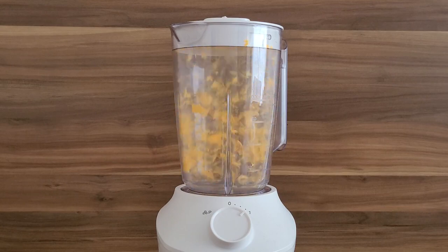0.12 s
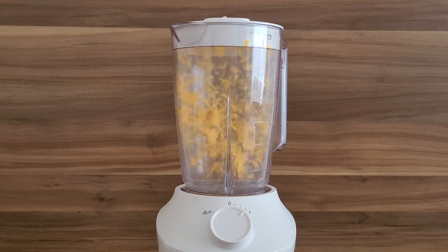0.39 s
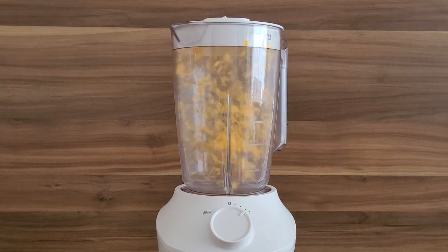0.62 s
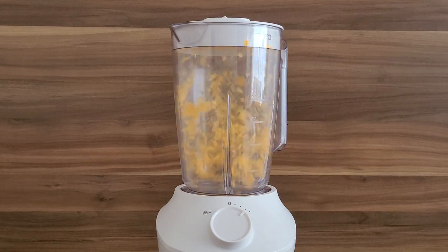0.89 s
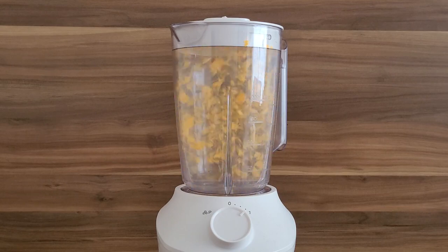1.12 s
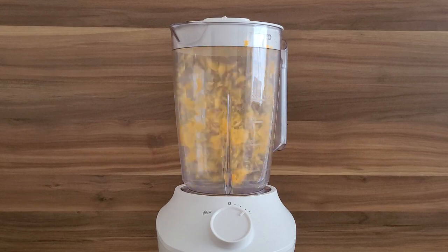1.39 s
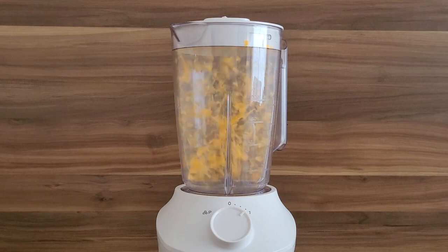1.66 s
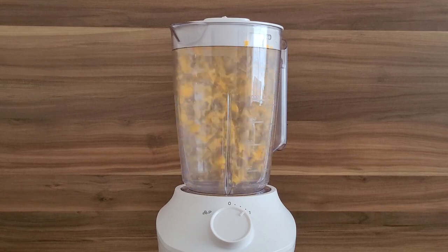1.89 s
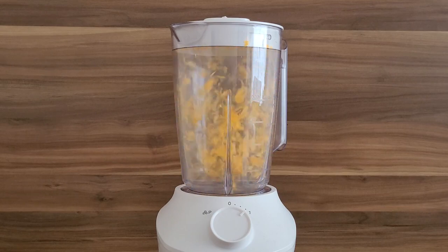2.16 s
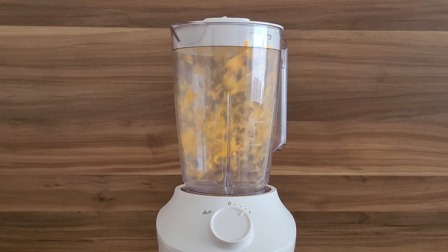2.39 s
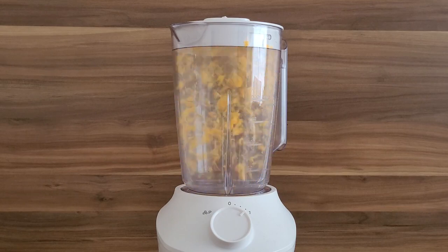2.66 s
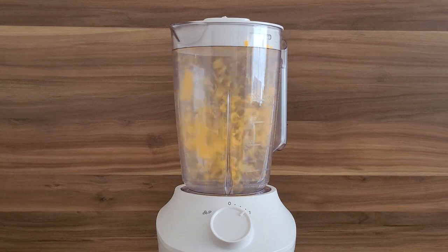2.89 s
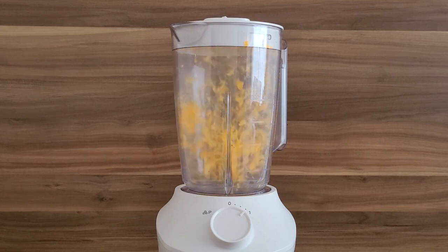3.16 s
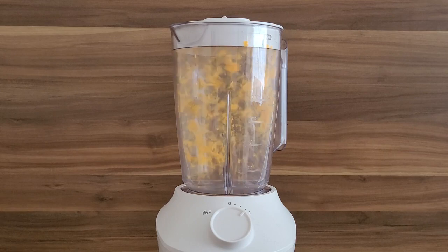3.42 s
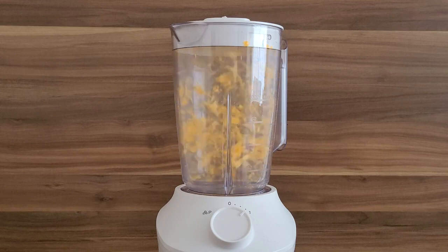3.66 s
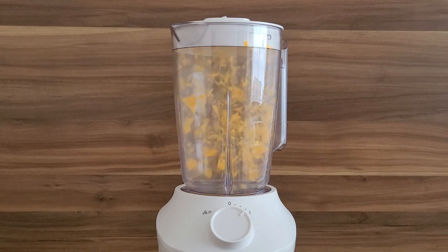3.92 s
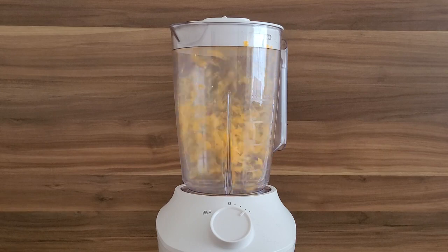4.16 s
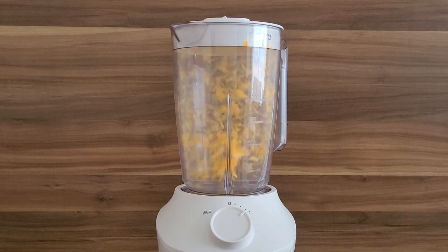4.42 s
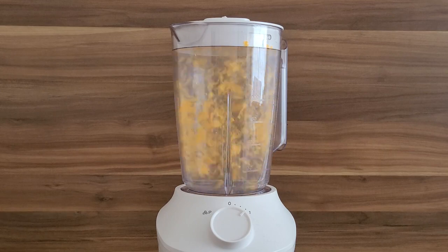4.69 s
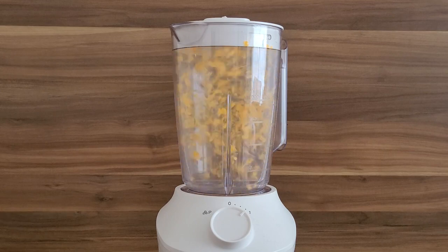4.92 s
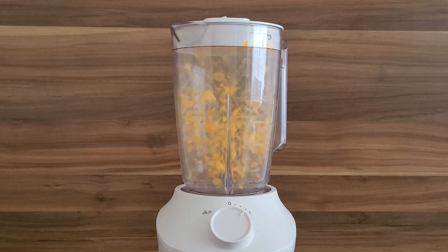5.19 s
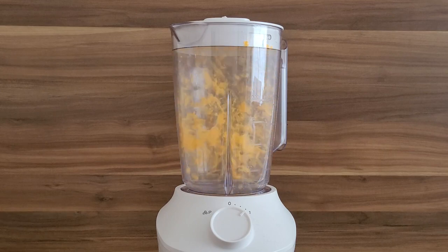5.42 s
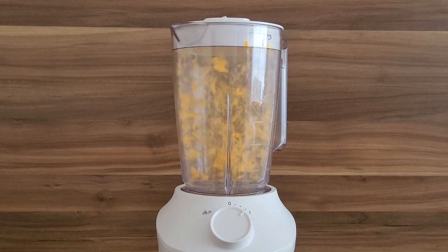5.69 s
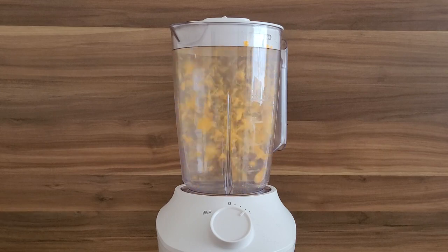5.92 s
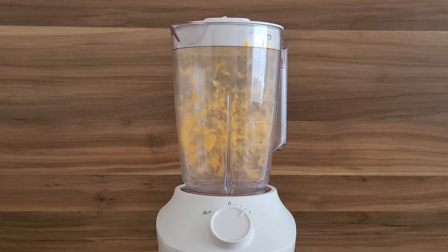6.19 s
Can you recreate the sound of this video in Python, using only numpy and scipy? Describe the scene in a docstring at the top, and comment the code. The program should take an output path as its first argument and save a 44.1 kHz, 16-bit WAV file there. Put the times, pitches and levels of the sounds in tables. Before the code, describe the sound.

Close, loud blender in a small reflective kitchen: constant motor drone and rushing air, covered by a dense crisp rattle of small plastic pieces. Irregular snaps and clacks burst out several times a second, thickest after the middle, when the motor roar also grows a little stronger. A few heavy low pops strike the left microphone. The sound begins and ends mid-run.

```python
"""In a small hard kitchen a countertop blender runs at full speed with thin plastic shards whirling in its jar.
The shaft hums as sine tones over a roar of air and housing, made of random spectra through resonances.
Shards rattle in waves of filtered ticks; cracks (noise bursts) and knocks (decaying sines) echo off the walls.
Jolts pop the left microphone as filtered pressure steps, and a limiter ducks both sides on the loudest peaks."""
import sys
import numpy as np
from scipy import signal
from scipy.fft import irfft
from scipy.io import wavfile
from scipy.ndimage import uniform_filter1d, minimum_filter1d

SR = 44100
rng = np.random.default_rng(int(sys.argv[2]) if len(sys.argv) > 2 else 0)


def amp(db):
    return 10 ** (np.asarray(db, float) / 20)


def wav_out(sig):
    """Save sig, one row per channel (or a flat mono array), as 16-bit PCM at SR to the path in sys.argv[1]."""
    wavfile.write(sys.argv[1], SR, np.round(np.clip(np.atleast_2d(sig).T, -1, 1) * 32767).astype(np.int16))


N = 278695

# loudness of motor and air, which the steady rattle follows too: (time [s], level [dB])
MOTOR_LEVEL = [(0.1, -31), (0.42, -30.5), (0.99, -29), (1.28, -31), (2.01, -31), (2.67, -33.5),
               (3.25, -33.5), (3.51, -32), (3.68, -28), (3.92, -28), (4.48, -28.5), (4.85, -28),
               (6.22, -30)]


def evened(x):
    """Scales to rms 1."""
    return x / np.sqrt(np.mean(x ** 2) + 1e-20)


def read(points, hz):
    """Value of a spectrum table at hz, interpolated along log frequency."""
    f, value = np.transpose(points)
    return np.interp(np.log(hz + 1), np.log(f + 1), value)


def curve(rows, axis):
    """One column of a time table, for every sample."""
    rows = np.array(rows)
    return np.interp(np.arange(N) / SR, rows[:, 0], rows[:, axis])


def waver(hz):
    """Slow random wander of rms 1, up to about hz."""
    smooth = uniform_filter1d(rng.standard_normal(N), size=300)
    return evened(signal.lfilter([1], [1, -np.exp(-2 * np.pi * hz / SR)], smooth))


def coloured(x, points):
    """Filters x by a spectrum table."""
    hz = np.fft.rfftfreq(512, 1 / SR)
    taps = np.roll(irfft(amp(read(points, hz))), 256) * np.hanning(512)
    return signal.oaconvolve(x, taps, "same")


def hum():
    """Shaft orders are sines locked to the turning shaft, each wavering a little in level."""
    # shaft speed: (time [s], speed [turns per s])
    shaft = [(0, 310.1), (2.1, 310.2), (2.5, 309.7), (3.4, 309.7), (3.8, 310.1), (6.32, 310.4)]
    # shaft orders: (multiple of the shaft speed, relative level [dB], left over right [dB])
    orders = [(1, 0.5, -3.5), (2, -18.5, -11.5), (3, -18, 2), (4, -31.5, 30.5), (12, -17, 4)]
    turns = np.cumsum(curve(shaft, axis=1)) / SR
    out = np.zeros((2, N))
    for k, db, left_db in orders:
        level = amp(db + 1.67 * waver(hz=11))
        tone = np.sqrt(2) * np.sin(2 * np.pi * (round(k) * turns + rng.random())) * level
        out += tone * amp([[left_db / 2], [-left_db / 2]])
    return out


def roar():
    """Air noise as random short-time spectra through the housing resonances, with drifting patches."""
    # roar of fan air and tiny shards: (frequency [Hz], relative level per Hz [dB])
    air_spectrum = [(30, -48), (60, -49), (100, -16.5), (190, -1.5), (330, 2), (520, -0.5), (1150, -1),
                    (2500, 0), (5000, -2.5), (8700, -12.5), (12000, -9.5), (14200, -14), (15700, -4)]
    # housing, jar and counter resonances, plus a narrow line at 410 Hz, 100 Hz above the shaft tone: (centre
    # [Hz], width [Hz], boost [dB])
    resonances = [(139, 39, 16.5), (232, 22.5, 7.5), (272.5, 35, 12), (318, 49, 2), (394.5, 27, 9),
                  (410, 9, 5.5), (760, 15, 7.5), (972, 107, 8), (1325, 19, 8.5), (1357, 51, 6.5),
                  (1935, 79, 3.5), (2390, 29, 9), (2635, 27, 7.5), (3470, 390, 4), (4680, 450, 0.5),
                  (7610, 680, 10.5), (10700, 210, 13)]
    # how alike the two microphones hear it: (frequency [Hz], left-right likeness [1 = same])
    likeness = [(60, 0.65), (130, 0.97), (290, 0.96), (640, 0.8), (1410, 0.57), (3100, 0.42), (6820, 0.062),
                (15000, 1)]
    # balance between the microphones: (frequency [Hz], left over right [dB])
    balance = [(60, -3), (110, -2), (200, 1.5), (380, 1), (700, 0.5), (1290, 0), (2380, 2.5), (4400, 1.5),
               (8120, -3), (15000, 14.5)]
    frames, hz = N // 1024 + 5, np.fft.rfftfreq(4096, 1 / SR)
    a, b, c, d, patches = rng.standard_normal((frames, 2049, 5)).T
    patches = uniform_filter1d(patches, size=40, axis=0)  # along frequency
    patches = evened(uniform_filter1d(patches, size=4, axis=1))  # along time
    body_db = read(air_spectrum, hz)
    for centre, width, boost in resonances:
        body_db = body_db + boost / (1 + (2 * (hz - centre) / width) ** 2)
    same = np.clip(read(likeness, hz), -1, 1)[:, None]
    tilt = amp(read(balance, hz) / 2)[:, None]
    left = a + 1j * b
    right = same * left + np.sqrt(1 - same ** 2) * (c + 1j * d)
    spectra = np.array([left * tilt, right / tilt]) * amp(body_db[:, None] + 0.53 * patches)
    air = evened(signal.istft(spectra, nperseg=4096, noverlap=3072)[1][:, :N])
    return amp(7.0 + 0.97 * waver(hz=40)) * air


def on_left(x):
    """Puts x at the left microphone, 34 dB weaker at the right."""
    return x * amp([[0], [-34]])


def supply_hum():
    """Faint steady mains sine, mostly on the left."""
    # supply hum: frequency [Hz], amplitude before the low cut [dB]
    mains = (50, -63)
    hz, db = mains
    return on_left(amp(db) * np.sin(2 * np.pi * hz * np.arange(N) / SR))


def wave_level():
    """Level of the swarm: each wave swells fast and fades more slowly, over a lull that follows the motor."""
    # waves of shards thrown up the jar wall: (time of crest [s], level [dB], length [s])
    crests = [(.07, -40, 0.041), (.18, -29, 0.13), (0.346, -25, 0.12), (0.634, -22.5, 0.082),
              (0.662, -26, .06), (0.763, -27, 0.082), (0.995, -17.5, 0.063), (1.116, -26.5, 0.12),
              (1.34, -29, 0.32), (1.504, -35, 0.092), (1.62, -28.5, 0.072), (1.817, -27, .2),
              (1.977, -29, 0.25), (2.114, -28, 0.18), (2.364, -29.5, 0.075), (2.556, -27.5, 0.033),
              (2.645, -25.5, 0.087), (2.822, -31, 0.076), (2.978, -21.5, 0.041), (3.257, -22, .05),
              (3.511, -20.5, 0.066), (3.707, -29, 0.18), (3.84, -24, 0.051), (3.954, -26, 0.054),
              (4.024, -36, 0.037), (4.229, -18.5, .07), (4.463, -19, 0.066), (4.6, -21.5, 0.15),
              (4.885, -20.5, 0.083), (5.034, -29, .1), (5.156, -25, 0.23), (5.603, -26, 0.095),
              (5.75, -25, 0.43), (6.19, -22.5, 0.12), (6.31, -31, .1)]
    rise, drop_db = 0.6, -13.5  # rise time as a share of the length; fall over one length
    lull_db = -3.5  # rattle between waves, over the motor level
    t = np.arange(N) / SR
    power = amp(2 * (curve(MOTOR_LEVEL, axis=1) + lull_db))
    for s, db, length in crests:
        away = np.maximum((t - s) / length, (s - t) / (rise * length))
        power = power + amp(2 * (db + drop_db * away))
    return np.sqrt(power)


def rattle(count=10):
    """Thousands of small shards a second tick the wall, each tick ringing in one of several bands chosen at
    random; a few are large."""
    # colour of the swarm: (frequency [Hz], relative level per Hz [dB])
    swarm = [(500, -46), (900, -22), (1500, -10), (2600, -3), (4200, -6), (5000, 1), (7500, -1), (9500, -3),
             (12300, 4), (14200, -1.5), (15700, 0.5)]
    ticks_per_s = 2600
    ticks = (rng.random(N) < ticks_per_s / SR) * amp(4.9 * np.minimum(rng.exponential(1, N), 4))
    kind, noise = rng.integers(0, count, N), rng.standard_normal(N)
    decay = np.exp(-np.arange(300) / 38.0)  # in samples, just under 1 ms
    snaps = np.zeros(N)
    for k, hz in enumerate(np.geomspace(1300, 14500, count)):
        burst = signal.oaconvolve(ticks * (kind == k), decay)[:N] * noise
        ringing = signal.lfilter(*signal.iirpeak(hz, 2.5, SR), burst)
        snaps += .5 * burst + np.sqrt(9000 / hz) * ringing
    return evened(coloured(snaps, swarm)) * wave_level()


def cracks():
    """Each crack is a noise burst of about 3 ms, strengthened where the shard rings; lesser ones fall at random."""
    # single cracks, before the room: (time [s], peak level [dB], ring of the shard [Hz])
    single = [(0.0715, -8, 12300), (0.3396, -12, 7920), (0.4449, -10.5, 2630), (0.5089, -7, 3560),
              (0.578, -6, 7740), (0.628, -11, 11900), (0.7404, -5.5, 4820), (0.7614, -5, 12500),
              (0.8435, -6.5, 11100), (1.258, -4.5, 7660), (1.3164, -7, 7240), (1.474, -7.5, 12000),
              (1.514, -7, 7240), (1.6072, -11, 5650), (1.7817, -10, 7300), (1.8334, -9, 7450),
              (1.8724, -5.5, 7670), (2.053, -12, 12500), (2.0853, -7, 2610), (2.3206, -9.5, 3460),
              (2.369, -9.5, 12400), (2.7931, -12, 12000), (2.9786, -11, 12200), (3.242, -9, 10700),
              (3.259, -5, 12400), (3.3538, -14.5, 5900), (3.444, -12, 12400), (3.484, -8, 11100),
              (3.5016, -5.5, 12100), (3.5772, -9.5, 6460), (3.65, -11, 7410), (3.6845, -5, 10700),
              (3.7227, -3, 11100), (3.7559, -5, 12400), (3.835, -9, 13800), (3.9402, -7, 12400),
              (4.0238, -4, 10300), (4.0664, -6.5, 12000), (4.202, -9, 12400), (4.2287, -8, 11800),
              (4.417, -5, 12100), (4.5377, -7, 10700), (4.6145, -7, 7800), (4.6874, -10, 11000),
              (4.696, -7.5, 7730), (4.7506, -8, 2900), (4.8212, -5.5, 5860), (4.8614, -7, 11500),
              (4.892, -7, 4740), (5.0157, -3.5, 10600), (5.1614, -8, 7430), (5.4316, -13, 14800),
              (5.475, -9, 7330), (5.521, -14, 11000), (5.5737, -7, 7810), (5.6924, -8, 10700),
              (5.7167, -6, 5430), (5.7564, -10, 11500), (5.9142, -8.5, 9820), (6.0658, -10, 4750),
              (6.1934, -8.5, 7380), (6.2167, -9, 10700)]
    # colour of one crack: (frequency [Hz], relative level per Hz [dB])
    shard = [(410, -54), (700, -1), (1150, -15.5), (1360, -3.5), (1600, -4.5), (2590, -6), (4190, -7),
             (5020, -1), (9980, -4), (12300, -0.5), (15500, -3)]
    small_per_s, small_db, small_spread_db = 6.5, -11, 1.5
    when, size, tone = rng.random((round(small_per_s * N / SR), 3)).T
    levels = small_db - small_spread_db * 2 * size
    small = zip(when * N / SR, levels, 3000 * (14000 / 3000) ** tone)  # ring 3 to 14 kHz
    t, out = np.arange(1500) / SR, np.zeros(N + 1500)
    shape = (1 - np.exp(-t / .0004)) * np.exp(-t / .0028)
    for s, db, hz in list(single) + list(small):
        noise = rng.standard_normal(1500)
        bright = signal.lfilter(*signal.iirpeak(min(hz, 20000), 2.2, SR), noise)
        snap = shape * evened(coloured(noise + 0.61 * bright, shard))
        out[round(s * SR):][:1500] += amp(db) * snap / abs(snap).max()
    return out[:N]


def knocks():
    """Bigger pieces knock the jar wall, which rings briefly in a few decaying modes."""
    # knocks, before the room: (time [s], peak level [dB], tone of the struck patch [Hz])
    struck = [(.14, -10.5, 2400), (.297, -17, 1610), (.989, -9.5, 1480), (1.05, -8.5, 2560),
              (1.257, -8.5, 2560), (2.0836, -10, 1630), (3.5763, -11, 2200), (3.7219, -10.5, 1430),
              (3.7534, -10.5, 1350), (4.2273, -19, 1350), (4.4427, -14, 1380), (4.5675, -13, 1400),
              (4.6092, -16, 1260), (4.954, -25, 1340), (5.3368, -16, 2390), (5.773, -17, 1800)]
    # wall modes: (multiple of the patch tone, relative level [dB], time to fall 60 dB [s])
    modes = [(1, 0, .009), (1.35, -4, .007), (.72, -4, .012)]
    t, out = np.arange(1500) / SR, np.zeros(N + 1500)
    for s, db, hz in struck:
        ring = sum(amp(mode_db - 60 * t / t60) * np.sin(2 * np.pi * k * hz * t) for k, mode_db, t60 in modes)
        out[round(s * SR):][:1500] += amp(db) * ring / abs(ring).max()
    return out[:N]


def kitchen(x, count=6):
    """Direct sound, smeared echoes and a short tail; shards fly about, so six echo patterns alternate at random."""
    # counter and wall reflections: (delay [s], relative level [dB], smear [s])
    echoes = [(.0078, -4, 0.0022), (0.013, -16.5, .003), (.018, -9, .003), (.027, -27, .005)]
    t = np.arange(9000) / SR
    power = amp(2 * -36) * (t > .004) * amp(-120 * t / 0.32)  # tail: 60 dB down in 0.32 s
    for s, db, smear in echoes:
        power = power + amp(2 * db) * (t > s) * np.exp(-np.maximum(t - s, 0) / smear) / (smear * SR)
    place = np.repeat(rng.integers(0, count, N // 256 + 1), 256)[:N]
    left_db, right_db = 0.7, -0.7  # direct sound in decibels: amp() gives factors 1.08 and 0.92
    out = x * amp([[left_db], [right_db]])
    for k in range(count):
        shared, left, right = rng.standard_normal((3, 9000))
        taps = np.sqrt(power) * (0.51 * shared + 1.46 * np.array([left, right]))
        out += signal.oaconvolve((x * (place == k))[None], taps, axes=1)[:, :N]
    return out


def pops():
    """Each jolt is a pressure step on the left diaphragm, with a short ring of its mount."""
    # jolts at the left microphone: (time [s], step before filtering [dB], direction [+1 inward, -1 outward])
    steps = [(0.8456, -6.5, 1), (0.941, -26, 1), (1.0899, 4.7, -1), (1.639, -26, 1), (1.882, -28, 1),
             (2.2449, 9, 1), (2.353, -17, -1), (2.9616, -10, 1), (3.086, -18, 1), (3.255, -23, 1),
             (3.4813, -21, 1), (3.7567, -29, -1), (3.8354, -12, 1), (4.195, -18, 1), (4.645, -19, 1),
             (4.818, -13, 1), (5.1609, -10.5, 1), (5.9064, 0, 1), (6.131, -21, 1), (6.2167, -9.5, -1)]
    jolts = (rng.random(N) < 8 / SR) * rng.standard_normal(N) * amp(-51)  # about 8 faint ones a second
    for s, db, way in steps:
        jolts[round(s * SR)] = np.sign(way) * amp(db)
    t = np.arange(2000) / SR
    ring = amp(-14.7 - 60 * t / .037) * np.sin(2 * np.pi * 258 * t)
    pressure = np.cumsum(jolts) + signal.oaconvolve(jolts, ring)[:N]
    # the diaphragm rounds off each jolt above 2300 Hz
    soft = signal.lfilter(*signal.butter(2, 2300, fs=SR), pressure)
    # the pressure leaks away through the vent
    return on_left(signal.lfilter(*signal.butter(1, 142, "high", fs=SR), soft))


def scene():
    """Motor, shards in the room, supply hum, and jolts at the microphone."""
    motor = amp(curve(MOTOR_LEVEL, axis=1)) * (hum() + roar())
    shards = kitchen(rattle() + cracks() + knocks())
    return motor + supply_hum() + shards + pops()


def left_port(left):
    """Phase lead of the left microphone port, which varies with frequency."""
    # port phase: (frequency [Hz], lead of the left port [radians])
    port_lead = [(0, 0), (340, -0.2), (1120, 0.4), (1550, -0.2), (1810, 0.4), (2330, 0.2), (3360, 0.3),
                 (4650, 0.1), (5170, 1.0), (7840, -0.0), (16700, 0.0)]
    hz = np.fft.rfftfreq(512, 1 / SR)
    taps = np.roll(irfft(np.exp(1j * read(port_lead, hz))), 255) * np.hanning(512)
    return signal.oaconvolve(left, taps, "same")


def low_cut(x):
    """Two resonant high-pass stages behind the microphone; they turn each pressure step into a falling thump."""
    # high-pass stages: (corner [Hz], Q)
    stages = [(56.4, 2.25), (28.2, 2.15)]
    for hz, q in stages:
        w = 2 * np.pi * hz
        x = signal.lfilter(*signal.bilinear([1, 0, 0], [1, w / q, w * w], SR), x)
    return x


def limiter(x):
    """Look-ahead limiter: the louder side's excess over -1 dB turns both sides down."""
    over_db = np.maximum(20 * np.log10(abs(x).max(0) + 1e-9) + 1.0, 0)
    ahead_db = -minimum_filter1d(-over_db, size=301)  # highest excess nearby, before and after
    fall = np.arange(N) * 2800. / SR  # lets go at 2800 dB per s
    held_db = np.maximum.accumulate(ahead_db + fall) - fall
    return x / amp(uniform_filter1d(held_db, size=281))


def top_cut(x):
    """Nothing passes above the cut-off."""
    return signal.sosfilt(signal.butter(12, 17100, fs=SR, output="sos"), x)


def record(dry):
    """Left port phase, low cut, limiter shared by both sides, then a steep band edge at 15.79 kHz."""
    heard = low_cut(np.array([left_port(dry[0]), dry[1]]))
    edge = signal.firwin(1023, 15790, window=("kaiser", 9), fs=SR)
    mix = signal.oaconvolve(limiter(heard), edge[None], "same")
    return top_cut(mix)


dry = scene()
out = record(dry)
wav_out(out)
```